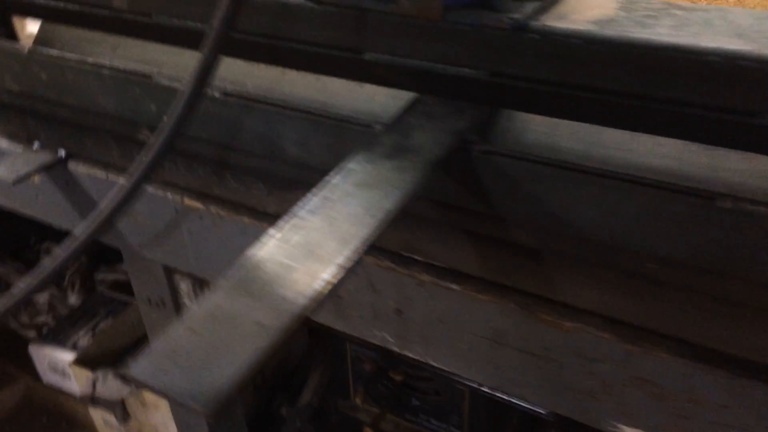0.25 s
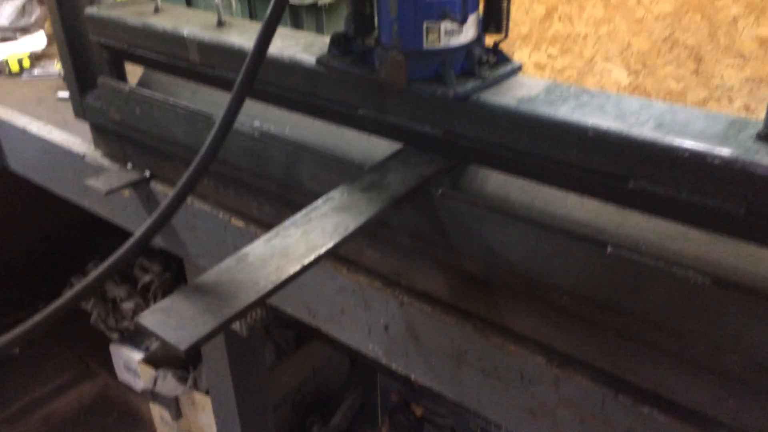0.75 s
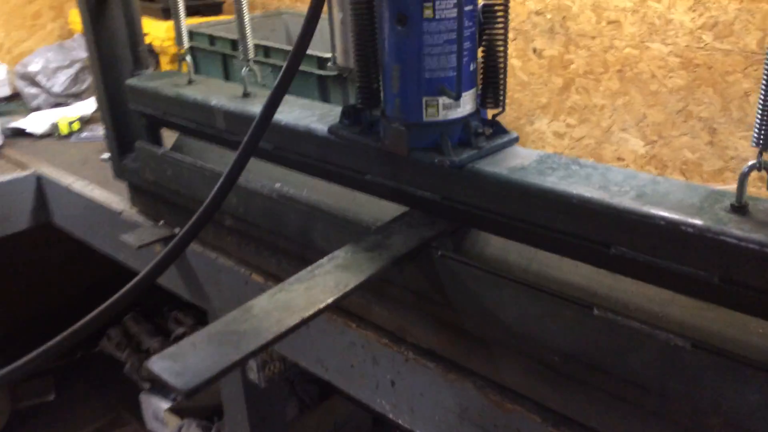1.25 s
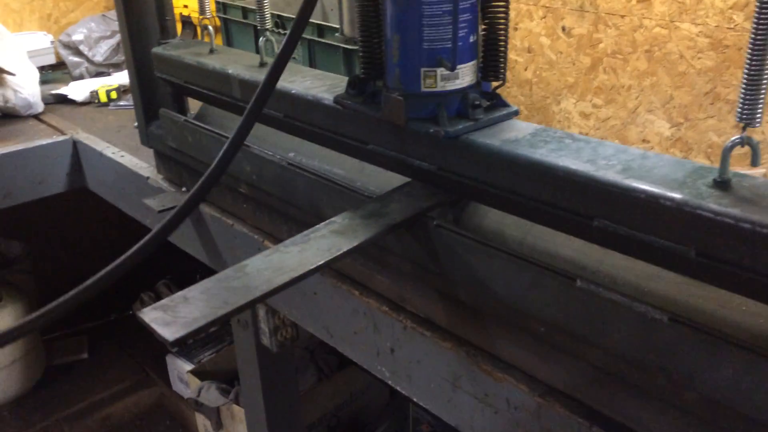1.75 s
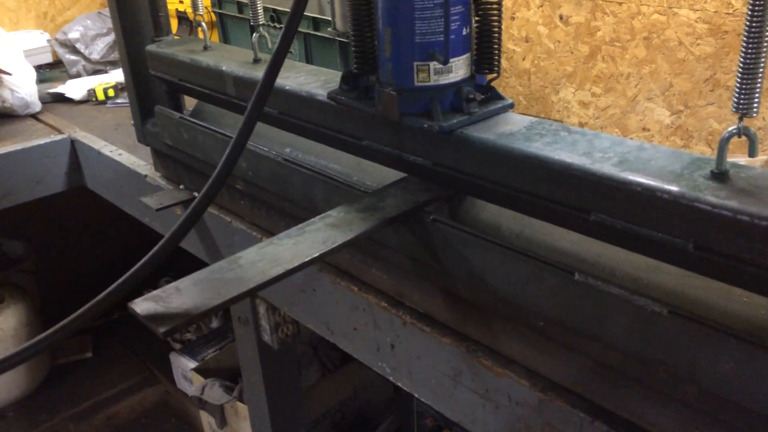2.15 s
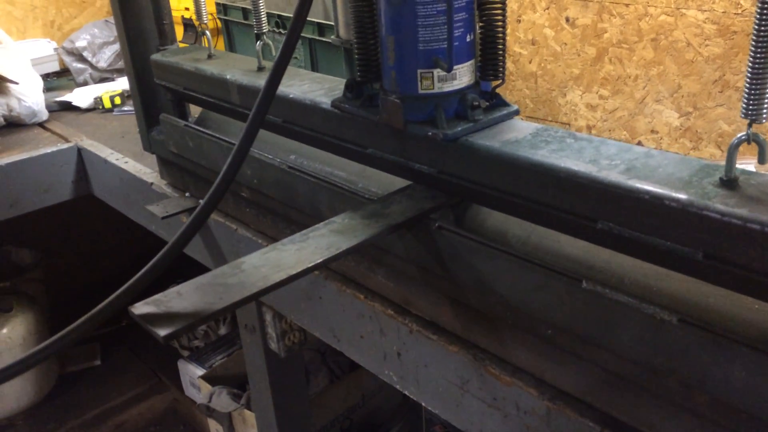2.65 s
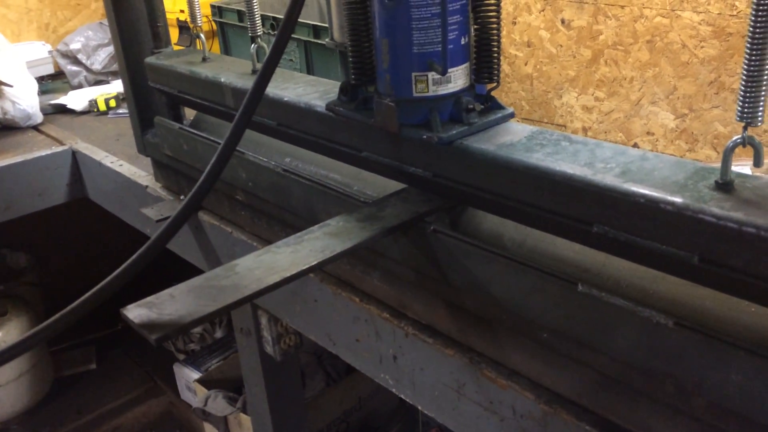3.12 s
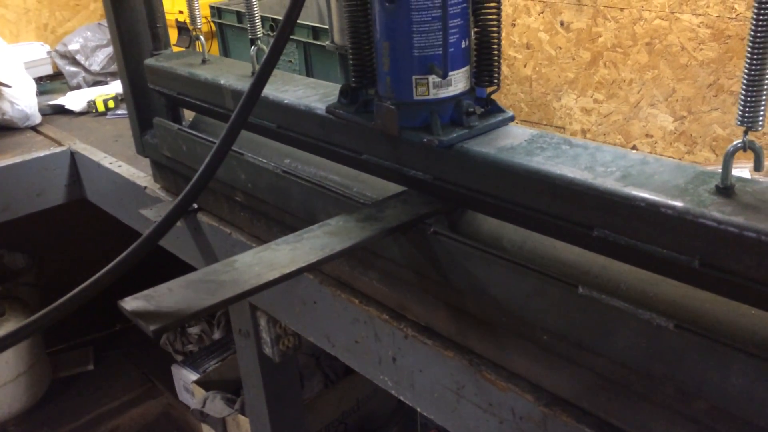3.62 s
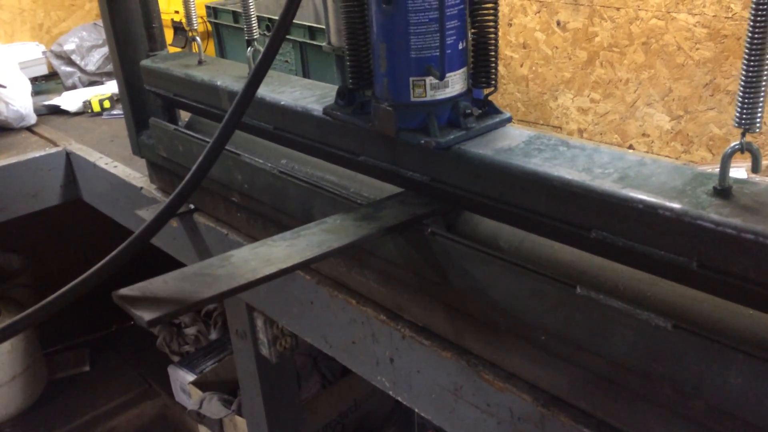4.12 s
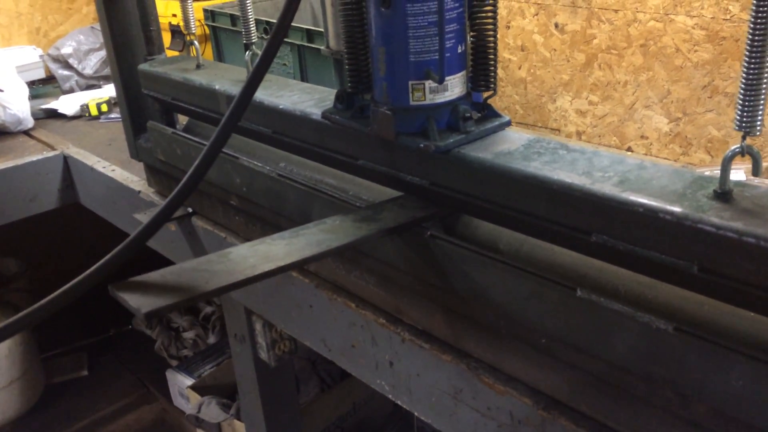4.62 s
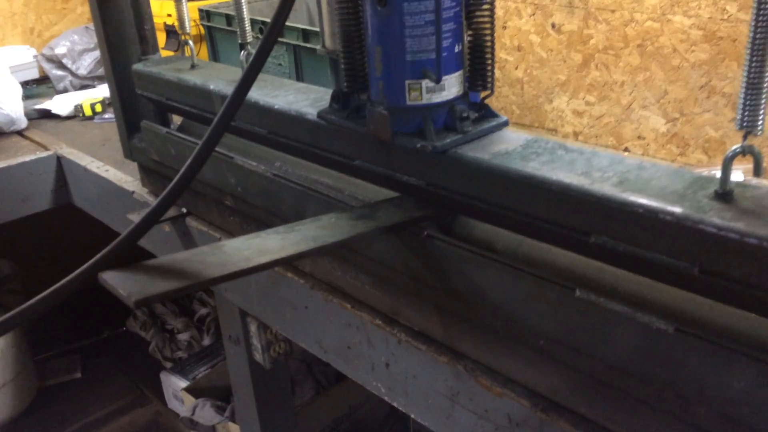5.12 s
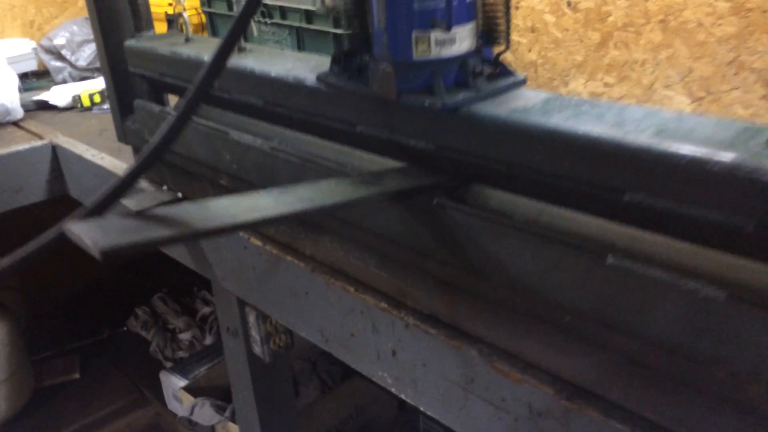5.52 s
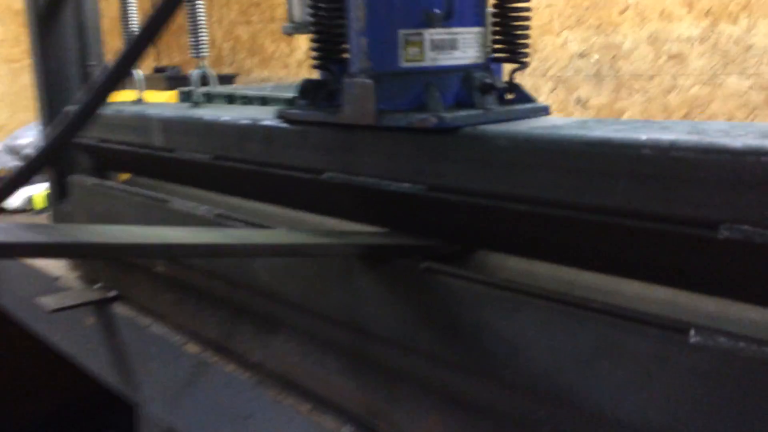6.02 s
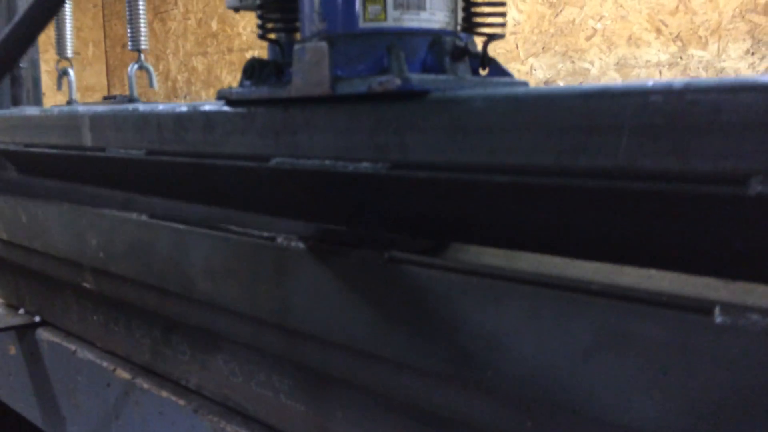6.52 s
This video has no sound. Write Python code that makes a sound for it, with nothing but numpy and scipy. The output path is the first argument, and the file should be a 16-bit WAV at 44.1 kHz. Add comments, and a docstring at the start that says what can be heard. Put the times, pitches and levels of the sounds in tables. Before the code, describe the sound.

In a small workshop, a compressor hums steadily after a short burst of air and a rattle of loose steel. About two seconds in, a pneumatic jack starts with a tiny whistle and hammers away with a strong pulsing hiss. Its quick strokes ease in pace as it presses a steel bar, then knock harder as the microphone approaches, with one short metal creak.

```python
"""An air-driven hydraulic jack presses a steel bar in a small workshop, over its compressor's drone. A last
stroke, a vent of air and the clinks of the valve closing end one run. At 1.82 s the valve whistles open; from
1.86 s the pump chatters, slowing as the load builds. Each stroke is a puff of exhaust, a thud and clatter of
the piston and a low pressure thump. From 5.7 s the microphone moves in and the blows grow; at 6.3 s the loaded
bar sticks and slips in one creak."""
import sys
import numpy as np
from scipy import signal
from scipy.fft import rfft, irfft
from scipy.io import wavfile

SR = 44100
rng = np.random.default_rng(int(sys.argv[2]) if len(sys.argv) > 2 else 0)


def dump(signal):
    """Clip the signal to [-1, 1] and save it as 16-bit WAV at the path in sys.argv[1]."""
    limited = np.clip(np.atleast_2d(signal).T, -1, 1)
    pcm = np.round(limited * 32767).astype(np.int16)
    wavfile.write(sys.argv[1], SR, pcm)


N = 298116
TIME = np.arange(N) / SR
HZ = np.fft.rfftfreq(N, 1 / SR)

# pump speed, free at first, then loaded: t/s, rate/(strokes/s)
PUMP_RATE = [(1.86, 17.58), (2.466, 17.4), (3.08, 13.52), (3.906, 12.87), (6.76, 11.805)]
PUMP_START_S = PUMP_RATE[0][0]


def gain_of(db):
    """Decibels to amplitude."""
    return 10 ** (np.asarray(db) / 20)


def unit_rms(x):
    """Scales to rms 1."""
    return x / np.sqrt(np.mean(x ** 2) + 1e-20)


def colour(points):
    """Gain per frequency from rows of f/Hz, level/dB."""
    hz, db = np.transpose(points)
    return gain_of(np.interp(np.log(HZ + 1), np.log(hz), db))


def resonances(modes):
    """Complex gain per frequency from rows of f/Hz, width/Hz, level/dB."""
    return sum(gain_of(db) / (1 + 2j * (HZ - hz) / width) for hz, width, db in modes)


def noise(gain):
    """Noise of rms 1, shaped by a gain per frequency."""
    return unit_rms(irfft(rfft(rng.standard_normal(N)) * gain, N))


def waver(rate_hz):
    """Random fluctuation of rms 1, up to about rate_hz."""
    return noise(1 / (1 + (HZ / rate_hz) ** 4))


def add(mix, start_s, sound):
    """Adds a sound in place; a negative start counts as 0."""
    part = mix[max(round(start_s * SR), 0):][:len(sound)]
    part += sound[:len(part)]


def bursts(times_s, levels_db, rise_s, length_s, shape):
    """Envelope of fast-rising, decaying bursts, summed in power."""
    power = np.zeros(N)
    for s, db in zip(times_s, levels_db):
        age = np.arange(max(-s, 0), length_s * 4, 1 / SR)
        burst = gain_of(db) * (1 - np.exp(-age / rise_s)) * np.exp(-(age / length_s) ** shape)
        add(power, s, burst ** 2)
    return np.sqrt(power)


def with_tail(envelope, t60_s, wet_db):
    """Adds the room's diffuse tail to an envelope: energy lingers and decays."""
    pole = np.exp(-2 * np.log(1000) / (t60_s * SR))
    tail_power = signal.lfilter([1 - pole], [1, -pole], envelope ** 2)
    return np.sqrt(envelope ** 2 + gain_of(wet_db) ** 2 * tail_power)


def workshop(x, echoes=10, echo_db=-22, sway_s=.00006):
    """Early echoes off bench and walls; paths drift as the hand-held microphone sways."""
    out = x.copy()
    for delay_s in rng.uniform(.002, .02, echoes):
        lag = np.round((delay_s + sway_s * waver(.7)) * SR).astype(int)
        out += gain_of(echo_db) * x[np.clip(np.arange(N) - lag, 0, N - 1)] * (TIME > delay_s)
    return out


def compressor(stroke_hz=11.58, rush_db=-33.0, whirr_db=-44, flicker_db=1.0):
    """Piston overtones beat against the motor hum, in a rush of air and fan whirr."""
    # motor hum and whine: f/Hz, level/dB
    hum = [(120, -37.5), (240, -48), (329, -48), (387, -51), (480, -48.5), (637, -48.5), (962, -45),
           (1061, -51), (1197, -47.5), (1335, -54)]
    # piston throb: multiple of stroke rate, level/dB
    throb = [(8, -52), (10, -43), (11, -40.5), (13, -50), (14, -49), (15, -49), (22, -45), (23, -44),
             (28, -50)]
    # air rush spectrum: f/Hz, level/dB
    rush_spectrum = [(15, -18), (32, -6), (55, -6), (85, 2.5), (165, -8.5), (205, -1), (430, -6.5),
                     (600, -2), (780, -6), (980, -2.5), (1600, -8.5), (2300, -12.5), (3200, -17),
                     (8000, -22.5), (15000, -30)]
    # fan band: f/Hz, width/Hz, level/dB
    fan_band = [(942, 81, 0)]
    # gain of the whole drone: t/s, level/dB
    drone_curve = [(0, -3), (.15, -13), (.25, -9), (.36, -1), (1.8, -1.5), (2, -6.5), (4, -8.5),
                   (6.76, -10)]
    tones = np.zeros(N)
    for hz, db in list(hum) + [(k * stroke_hz, db) for k, db in throb]:
        phase = 2 * np.pi * (hz * TIME + rng.random())
        drift_rad = .11 * np.sqrt(hz / hum[0][0]) * waver(3.2)
        tones += gain_of(db) * np.sqrt(2) * np.sin(phase + drift_rad) * (1 + .12 * waver(9.6))
    rush = gain_of(rush_db) * noise(colour(rush_spectrum)) * gain_of(flicker_db * waver(24))
    whirr = gain_of(whirr_db) * noise(resonances(fan_band) ** 2)
    return (tones + rush + whirr) * gain_of(np.interp(TIME, *np.transpose(drone_curve)))


def valve_clinks(gain_db=-1):
    """The valve shuts with a few dull clinks that ring briefly in its resonances."""
    # dull taps: t/s, level/dB
    taps = [(.078, -25.5), (.092, -36), (.099, -32), (.141, -49)]
    # steel modes: f/Hz, width/Hz, level/dB
    steel_modes = [(872, 170, -8), (1430, 120, -1), (1730, 150, -1), (1970, 150, -1), (3100, 73, -4),
                   (3250, 70, -4)]
    times_s, db = np.transpose(taps)
    envelope = bursts(times_s, db + gain_db, rise_s=0.00044, length_s=0.0085, shape=1.1)
    steel = noise(resonances(steel_modes) / (1 + (HZ / 4200) ** 6))
    return with_tail(envelope, t60_s=0.34, wet_db=0.5) * steel


def bar_creak(jitter=0.034, scrape_db=-2):
    """The bar sticks and slips under the ram; slips and scraping drive its modes."""
    # stick-slip: t/s, level/dB, slip rate/Hz
    slip_curve = [(6.278, -53, 310), (6.285, -28, 320), (6.298, -22.5, 286), (6.308, -31, 292),
                  (6.318, -29, 230), (6.333, -35, 245), (6.345, -32, 210), (6.36, -63, 215)]
    # bar modes: f/Hz, width/Hz, level/dB
    bar_modes = [(390, 90, -3), (560, 160, 9), (885, 80, 4.5), (1140, 85, -2)]
    times_s, db, slip_hz = np.transpose(slip_curve)
    live = (TIME > times_s[0]) & (TIME < times_s[-1])
    cycles = np.cumsum(np.interp(TIME, times_s, slip_hz) * (1 + jitter * waver(194))) / SR
    slips = unit_rms(sum(np.cos(2 * np.pi * k * cycles) for k in range(2, 8)))
    drive = (slips + gain_of(scrape_db) * waver(1500)) * live
    out = np.zeros(N)
    out[live] = unit_rms(irfft(rfft(drive) * resonances(bar_modes), N)[live])
    return out * gain_of(np.interp(TIME, times_s, db))


def valve_whistle(jitter=.008):
    """Air sings on the edge of the barely open valve."""
    # edge tone: t/s, level/dB, f/Hz
    edge_tone = [(1.821, -60, 4700), (1.84, -41, 4820), (1.858, -34, 4840), (1.875, -60, 4880)]
    times_s, db, hz = np.transpose(edge_tone)
    live = (TIME > times_s[0]) & (TIME < times_s[-1])
    cycles = np.cumsum(np.interp(TIME, times_s, hz) * (1 + jitter * waver(310))) / SR
    return np.sin(2 * np.pi * cycles) * gain_of(np.interp(TIME, times_s, db)) * live


def air_leak(crack_db=-23.5, swell_db_per_s=420, stream_db=-17.5, fall_db_per_s=14, seep_db=-37.5):
    """Flow envelope: the valve vents, later cracks open; air past the piston dwindles to a seep."""
    age = TIME - PUMP_START_S
    vent = bursts(times_s=[0.0404], levels_db=[-9.5], rise_s=0.002, length_s=0.0074, shape=1.4)
    crack = gain_of(crack_db + swell_db_per_s * np.minimum(age, 0))
    stream = np.hypot(gain_of(stream_db - fall_db_per_s * age), gain_of(seep_db))
    return vent + np.where(age < 0, crack, stream)


def pump_strokes(ref_fill_s=.08, boost_db=3, settle_s=.18, approach_s=(5.73, 6.3)):
    """One row a stroke: t/s, puff/dB, clatter/dB, thud/dB, thump/dB."""
    # blow force, hard, then light until the ram bears on the bar: t/s, level/dB
    force_curve = [(1.92, 2), (2.4, -6), (2.86, -6.5), (3.08, 0)]
    cycles = np.cumsum(np.interp(TIME, *np.transpose(PUMP_RATE)) * (TIME > PUMP_START_S)) / SR
    times_s = TIME[np.searchsorted(cycles, np.arange(cycles[-1]), side="right")]
    fill_s = 1 / np.interp(times_s, *np.transpose(PUMP_RATE))
    puff_db = -13 + 5.5 * np.log2(fill_s / ref_fill_s)  # longer fill, stronger puff
    puff_db += boost_db * np.exp(-(times_s - PUMP_START_S) / settle_s)  # early puffs louder, then settle
    puff_db[0] -= 5  # half-filled cylinder
    force_db = np.interp(times_s, *np.transpose(force_curve))
    closeness = np.interp(times_s, approach_s, [0, 1])  # microphone nears the press frame
    scatter = rng.standard_normal((len(times_s), 3))
    clatter_db = -25.5 + force_db + 4 * closeness + scatter[:, 0]
    thud_db = -33 + .3 * force_db + 7.5 * closeness + 2 * scatter[:, 1]
    thump_db = -26.5 + .49 * force_db + 7 * closeness + 2.1 * scatter[:, 2]
    end_of_first_run = (-0.02, -9.5, -20.5, -13, -7)
    second_run = np.column_stack([times_s, puff_db, clatter_db, thud_db, thump_db])
    return np.vstack([end_of_first_run, second_run])


def thumps(times_s, levels_db, swing_hz=92, width_s=0.0053, frame_hz=168, frame_db=-6, frame_t60_s=0.074):
    """Each puff shoves the air in one short low swing; the press frame booms after it."""
    out = np.zeros(N)
    age = np.arange(-.03, .1, 1 / SR)
    boom_age = np.maximum(age, 0)
    swing_window = np.exp(-(age / width_s) ** 2)
    boom_decay = gain_of(frame_db - 60 * boom_age / frame_t60_s)
    for s, db, (stretch, detune) in zip(times_s, levels_db, rng.standard_normal((len(times_s), 2))):
        swing = -np.cos(2 * np.pi * swing_hz * (1 + 0.13 * stretch) * age) * swing_window
        boom = np.sin(2 * np.pi * frame_hz * (1 + 0.093 * detune) * boom_age) * boom_decay
        thump = gain_of(db) * (swing + boom)
        start_s = s + 0.002 + age[0]  # centred 2 ms after the stroke
        add(out, start_s, thump[max(round(-start_s * SR), 0):])
    return out


def piston(times_s, clatters_db, thuds_db, ring_db=-11, split_hz=900):
    """The piston thuds against its stop, then clatters and rings the housing."""
    # knock spectrum: f/Hz, level/dB
    knock_spectrum = [(100, -20), (270, -6.5), (350, 4), (520, 0.5), (750, 5), (1100, 3), (1500, 1),
                      (2200, 4), (3000, 1), (5000, -0.5), (12000, -24)]
    # housing peaks and dips: f/Hz, width/Hz, level/dB
    housing_modes = [(519, 36, 4), (623, 140, 3.5), (1400, 190, 2), (1790, 130, -0.5), (1974, 80, 4.5),
                     (2380, 150, -3.5)]
    # longest-ringing housing mode: f/Hz, width/Hz, level/dB
    ring_mode = [(2200, 220, 0)]
    housing_db = sum(db / (1 + (2 * (HZ - hz) / width) ** 2) for hz, width, db in housing_modes)
    body = colour(knock_spectrum) * gain_of(housing_db)
    lowpass = 1 / (1 + (HZ / split_hz) ** 6)
    stops = bursts(times_s, thuds_db, rise_s=0.0014, length_s=0.024, shape=3.4)
    blows = bursts(times_s, clatters_db, rise_s=0.0025, length_s=0.034, shape=8.9)
    clatter = with_tail(blows, t60_s=0.49, wet_db=-6.0) * noise(body * (1 - lowpass))
    ring = with_tail(blows, t60_s=0.62, wet_db=-6.5) * noise(resonances(ring_mode) ** 2)
    thud = with_tail(stops, t60_s=0.098, wet_db=-6.5) * noise(body * lowpass)
    return thud + clatter + gain_of(ring_db) * ring


def exhaust(times_s, puffs_db, lead_s=.0012, flutter_db=0.6):
    """The air motor dumps its cylinder once a stroke: turbulent hiss on top of the leak."""
    # hiss spectrum: f/Hz, level/dB
    hiss_spectrum = [(100, -8), (400, -14), (1000, -14), (2000, -10), (3300, -9.5), (4800, -7),
                     (6500, -3.5), (10000, -1.5), (13500, -0.5), (15500, -.5)]
    puffs = bursts(times_s - lead_s, puffs_db, rise_s=.0012, length_s=0.039, shape=2.36)
    envelope = with_tail(np.hypot(puffs, air_leak()), t60_s=0.13, wet_db=1.5)
    return envelope * noise(colour(hiss_spectrum)) * gain_of(-flutter_db * waver(290))


def scene(pump_db=-2.5, bass_cut_hz=36):
    """Jack and steel in the room, over the compressor; both channels alike."""
    times_s, puff_db, clatter_db, thud_db, thump_db = pump_strokes().T
    pump = workshop(exhaust(times_s, puff_db) + piston(times_s, clatter_db, thud_db))
    jack = gain_of(pump_db) * pump + thumps(times_s, thump_db) + valve_whistle()
    # a small outlet radiates little deep bass
    jack = irfft(rfft(jack) * HZ ** 4 / (HZ ** 4 + bass_cut_hz ** 4), N)
    mono = jack + valve_clinks() + bar_creak() + compressor()
    return np.array([mono, mono])


def record(dry):
    """Steep low-pass at 15.4 kHz."""
    lowpass = signal.firwin(511, 15400, window=("kaiser", 8), fs=SR)
    return signal.oaconvolve(dry, lowpass[None], "same")


dry = scene()
out = record(dry)
dump(out)
```